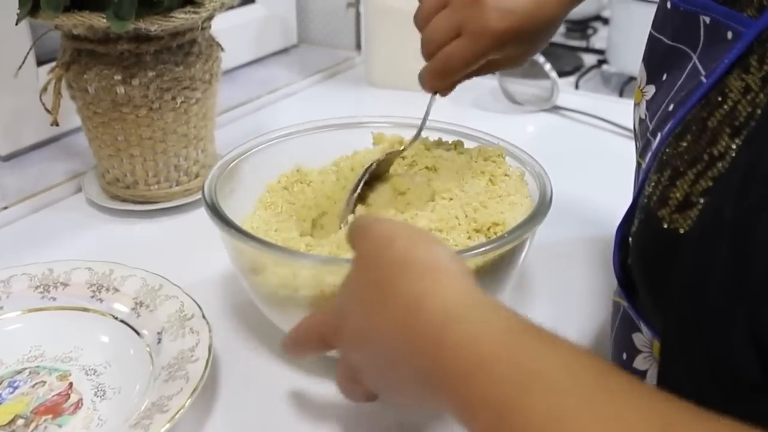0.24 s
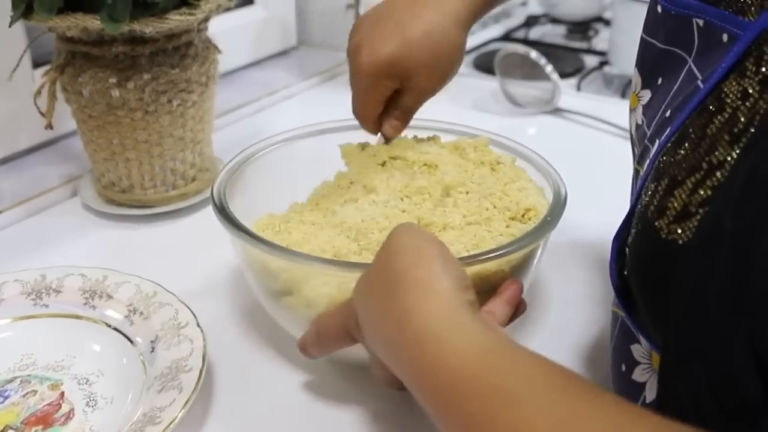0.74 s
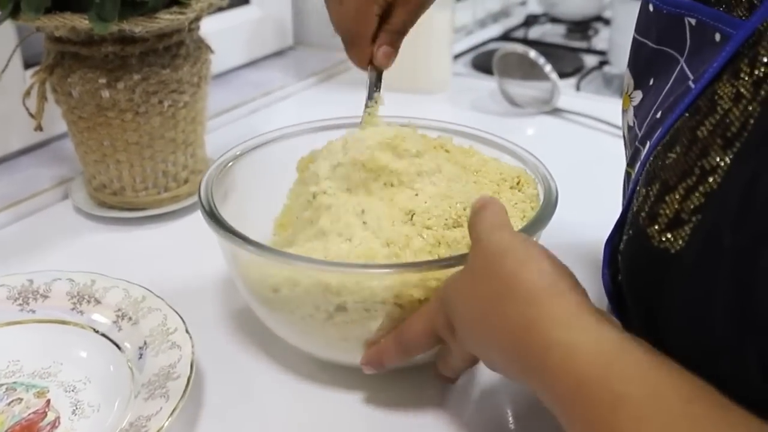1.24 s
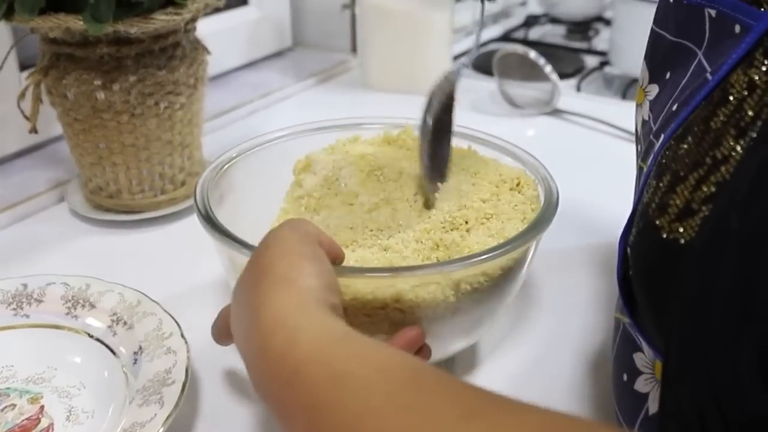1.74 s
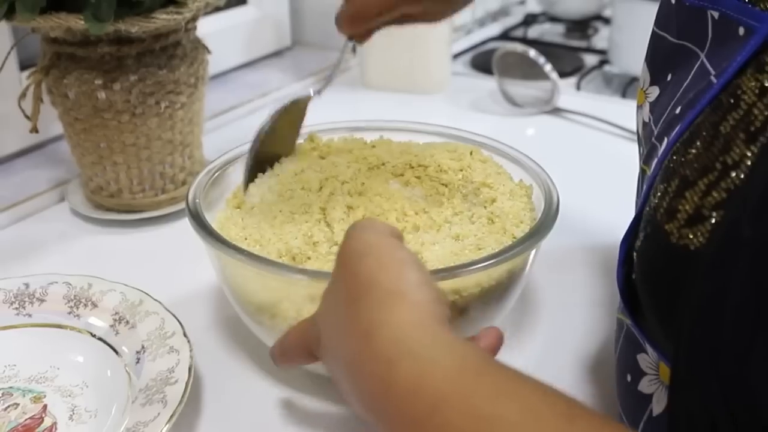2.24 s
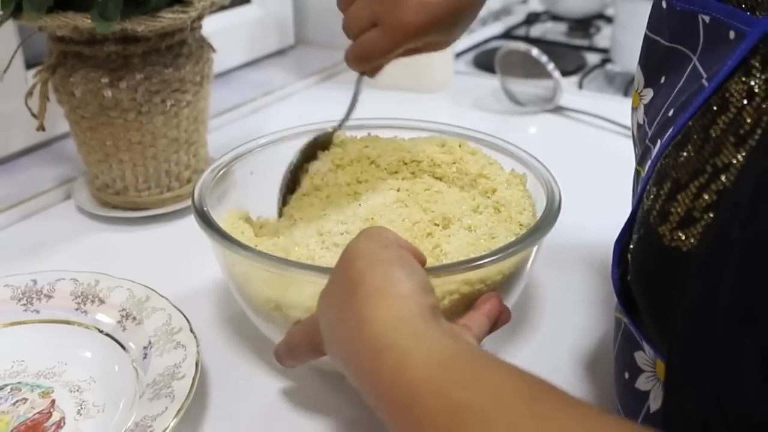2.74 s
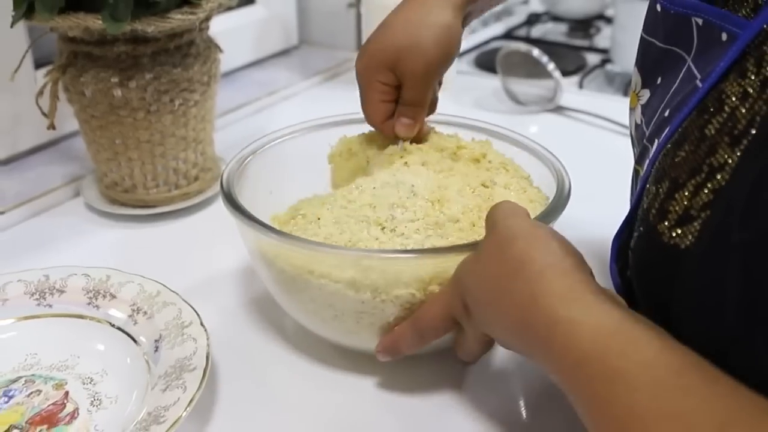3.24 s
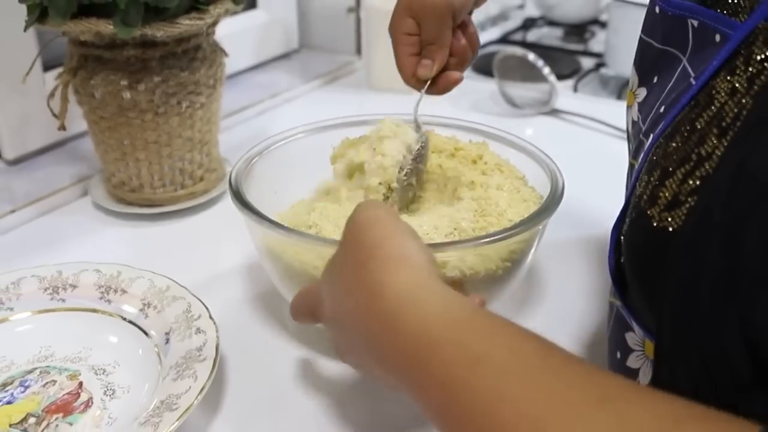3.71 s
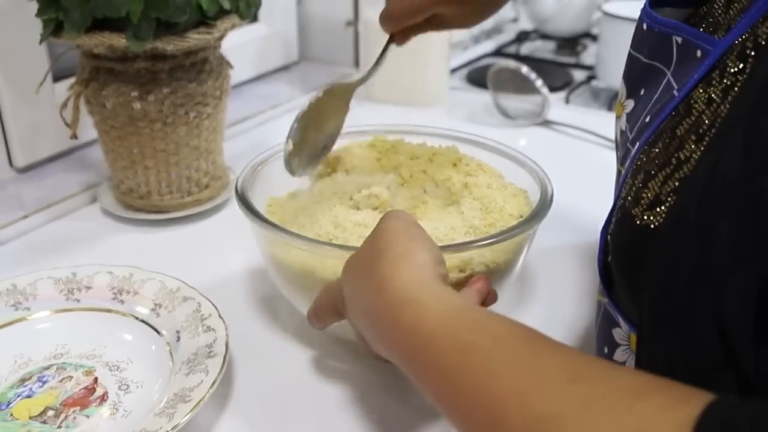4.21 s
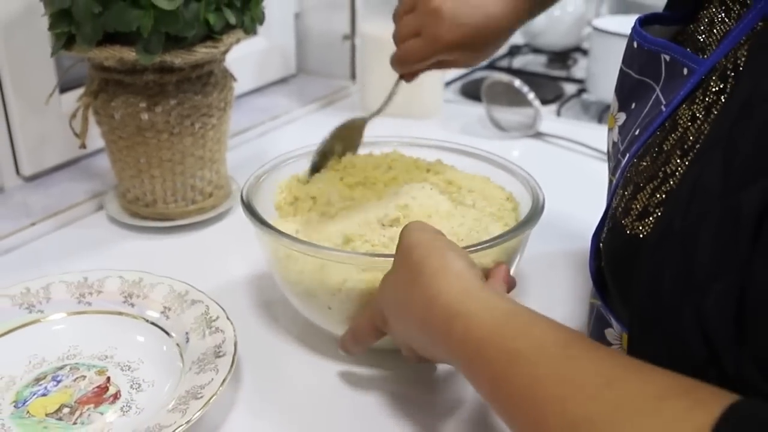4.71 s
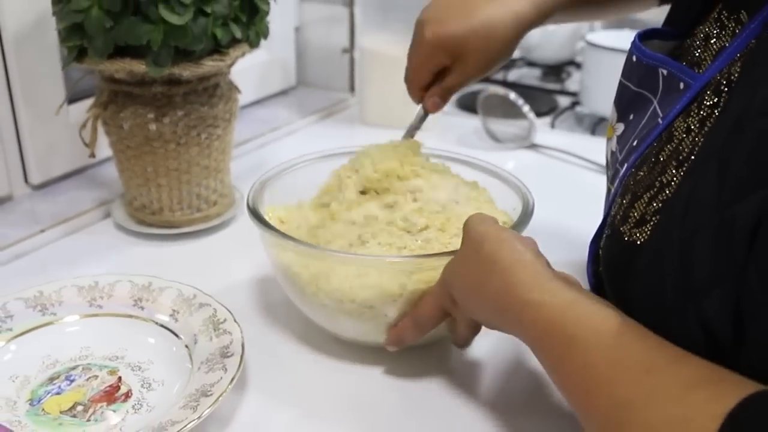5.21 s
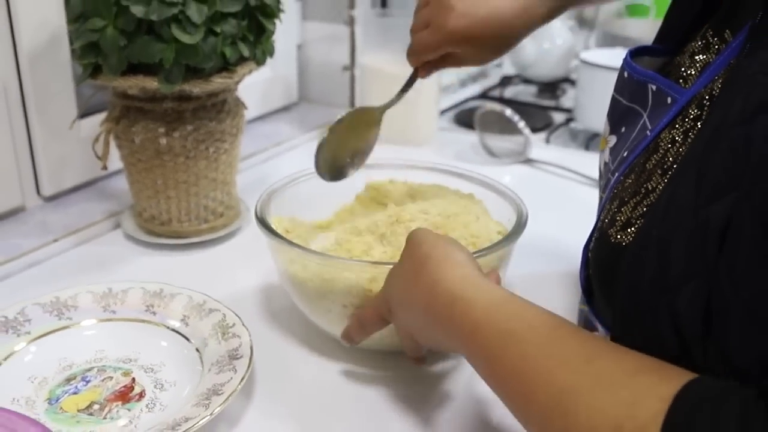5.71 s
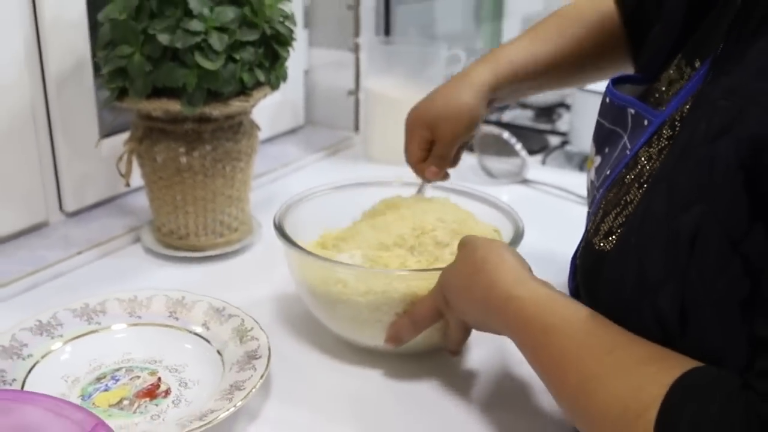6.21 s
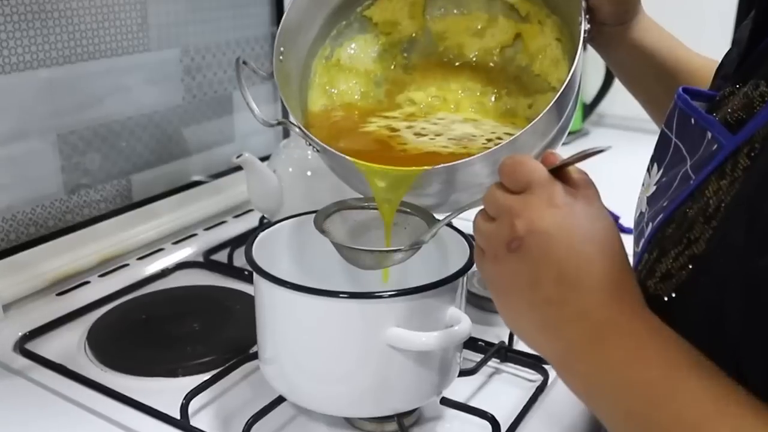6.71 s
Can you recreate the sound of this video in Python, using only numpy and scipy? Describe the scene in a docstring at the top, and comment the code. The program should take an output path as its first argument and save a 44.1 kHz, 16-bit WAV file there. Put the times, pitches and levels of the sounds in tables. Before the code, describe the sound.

Soft rustling of ground nuts and sugar, loud spoon clinks on glass and a bowl bumping the counter, followed by booming pan knocks.

```python
"""A soft rustle comes first: a metal spoon stirs ground nuts and sugar in a glass bowl in a small kitchen.
Its edge scrapes the glass and strikes a few loud clinks, which a limiter ducks. Turned by hand, the bowl
slips on the counter in bumps and squeaks. A fluttering whir, likely a gas flame, runs behind.
After a short silent break a metal pan booms at the stove: two knocks and a faint third."""
import sys
import numpy as np
from scipy import signal
from scipy.fft import rfft, irfft, next_fast_len
from scipy.io import wavfile
from scipy.ndimage import uniform_filter1d, minimum_filter1d

SR = 44100
rng = np.random.default_rng(int(sys.argv[2]) if len(sys.argv) > 2 else 0)


def output_pcm(signal):
    """Save a mono or channel-first signal as 16-bit PCM at the path in sys.argv[1].

    Samples are clipped to [-1, 1] before scaling.
    """
    pcm = np.clip(np.atleast_2d(signal).T, -1, 1) * 32767
    wavfile.write(sys.argv[1], SR, np.round(pcm).astype(np.int16))


N = 306486
TIME = np.arange(N) / SR

# spoon hits on glass: (time [s], strength [dB], contact cut-off [Hz], ring [dB], crack t60 [s],
# pan left [dB], mode favoured by the strike point [Hz], its boost [dB])
CLINKS = [(0.602, -2.5, 13200, 5, 0.069, -1.5, 3300, 1), (0.6068, -0.5, 10950, -10.5, 0.037, 3, 3270, 3),
          (2.7652, -19.5, 6900, -0.5, 0.16, 2, 1120, 8.5), (2.815, -18.5, 12100, -8, 0.11, 0.5, 2070, 12),
          (4.78, -5, 7030, 1.5, 0.081, 1, 4380, 8), (5.9196, -1, 6460, -0.5, 0.054, 0, 6030, 3.5)]
# modes of the filled bowl: (frequency [Hz], level [dB], t60 [s])
BOWL_MODES = [(1112, -13, 0.06), (2063, -12, 0.06), (2160, -8.5, 0.024), (3268, -2.5, 0.04),
              (3347, -10, 0.12), (4684, -3.5, 0.064), (4774, -7, 0.14), (6300, -15.5, .085),
              (7420, -37.5, 0.031), (7430, -13, 0.051), (7790, -18, 0.079), (9300, -32.5, .05),
              (10450, -57, 0.03986), (13800, -43, .05)]
# tone of the contact crack: (frequency [Hz], gain [dB])
CRACK_COLOUR = [(90, -31), (170, -18), (450, 3.5), (750, 0.5), (1200, -5), (2500, -3), (4200, 6),
                (5800, 2.5), (7800, 0.5), (10000, -6.5), (13000, -12), (15500, -17)]
# spoon strokes through the crumbs: (time [s], length [s], relative level [dB])
STROKES = [(0.0, 0.42, -50), (1.15, 0.26, -56.5), (1.98, 0.61, -57), (3.145, 1.1, -57.5), (4.38, 0.65, -53),
           (5.07, 1.1, -54), (6.2, 0.15, -52.5)]
# tone of shifting crumbs: (frequency [Hz], gain [dB])
CRUMB_COLOUR = [(100, -24.5), (800, 0), (2000, 7), (3600, 7), (6500, -9), (9000, -17.5), (15000, -32.5)]
# the spoon's edge scraping the glass: (time [s], length [s], level [dB])
SCRAPES = [(0.26, 0.047, -53.5), (0.388, 0.035, -48), (0.841, 0.017, -38.5), (2.92, 0.019, -52),
           (3.028, 0.043, -40.5), (3.052, 0.021, -37), (5.158, 0.02, -60)]
# tone of metal dragging on glass: (frequency [Hz], gain [dB])
SCRAPE_COLOUR = [(100, -11), (1000, -5.5), (3600, 9.5), (6500, 5.5), (9000, -0.5), (15000, -21)]

# the bowl juddering on the counter: (time [s], length [s], level [dB], tilt [dB/octave])
BUMPS = [(0.343, 0.023, -44, 12), (0.4139, 0.0066, -29.5, 5.5), (0.96, 0.014, -45, -10),
         (2.39, 0.047, -33, -5), (2.768, 0.037, -41, -6), (2.948, 0.0055, -43, 12),
         (3.049, 0.026, -39.5, 1), (3.112, 0.01, -29, 0.5)]
# what a judder shakes, the lows for longer: (frequency [Hz], width [Hz], level [dB], linger [s])
COUNTER_RESONANCES = [(135, 110, -17.5, 0.08), (350, 300, -1.5, 0.018), (750, 540, -3.5, 0.003),
                      (1286, 440, -2.5, 0.001)]
# the bowl sliding round with a low rumble: (time [s], length [s], level [dB])
SLIDES = [(0.874, 0.25, -50.5), (3.124, 0.085, -48), (3.729, 0.19, -53)]
# glass squeaking on the counter: (time [s], length [s], level [dB], start pitch [Hz], end pitch [Hz])
SQUEAKS = [(0.365, 0.03, -28, 808, 738), (0.381, 0.027, -36, 1219, 1246)]

# pan knocks: (time [s], level [dB], free ring [s], ring gain at rest [dB], scuff [dB], favoured mode [Hz])
KNOCKS = [(6.5224, -15, .095, -29, -15.5, 3450), (6.7192, -16, .085, 1.5, -22, 3640),
          (6.882, -30.5, .1, -3, -14.5, 3580)]
# modes of the pan: (frequency [Hz], level [dB], t60 [s])
PAN_MODES = [(184, -23, 0.2), (239.6, -23, 0.25), (342.6, -18.5, 0.47), (408, -13, 0.24),
             (472.4, 1.5, 0.35), (554, -4, 0.12), (603, -13.5, 0.29), (948, -22.5, 0.21),
             (3500, -34.5, 0.55), (3585, -37.5, 0.44)]
# tone of the pan's scuff: (frequency [Hz], gain [dB])
SCUFF_COLOUR = [(100, -26), (400, -10), (600, 6.5), (800, 0), (2000, -7.5), (5000, -12), (15000, -33.5)]

# slow swings of the flame's whir: (time [s], relative level [dB])
FLAME_SWINGS = [(0, -36.5), (.6, -44.5), (.95, -40), (1.11, -45), (1.25, -39), (1.7, -46), (2.25, -39.5),
                (2.6, -43.5), (3.1, -40.5), (4.15, -37.5), (4.33, -43.5), (4.73, -37), (5.2, -38.5),
                (5.7, -36), (5.8, -40.5), (6.3, -36.5), (6.45, -40.5), (6.95, -40.5)]
# resonances of the whir: (frequency [Hz], width [Hz], level [dB])
WHIR_RESONANCES = [(1231, 58, -2), (1364, 171, 0), (1458, 59, -19.5)]
# higher resonances, lit by the flame's sputters: (frequency [Hz], width [Hz], level [dB])
FLUTTER_RESONANCES = [(1990, 230, 1), (2155, 520, -4), (3440, 590, -7.5)]
# the flame's loudest puffs: (time [s], relative flare level [dB], relative sputter level [dB])
LOUD_PUFFS = [(1.201, -29, -49), (1.238, -33, -48), (1.27, -30, -63), (1.413, -30, -52),
              (1.543, -30.5, -40.5), (1.782, -32, -54), (2.026, -41, -46), (3.441, -30, -44.5),
              (3.573, -31, -43), (3.828, -30, -44), (3.856, -39, -45), (3.986, -30, -48),
              (4.141, -29.5, -46), (4.237, -30, -56), (5.105, -25.5, -56), (5.167, -27.5, -39.5),
              (5.207, -25, -52), (5.362, -42, -45), (5.521, -31, -44)]

# decay of the kitchen: (frequency [Hz], t60 [s])
ROOM_T60 = [(150, .4), (1000, .48), (4500, .48), (8000, .45), (14000, .32)]
# tone of its reverb: (frequency [Hz], gain [dB])
ROOM_COLOUR = [(80, -7.5), (200, 6.5), (500, 3), (1100, 5), (2200, 5.5), (4700, -2.5), (8000, -3.5),
               (14000, -3.5)]
# tone of the steady kitchen air: (frequency [Hz], gain [dB])
AIR_COLOUR = [(25, -11), (50, -1.5), (80, 0), (120, 1.5), (270, 3.5), (380, -0.5), (650, -1.5),
              (1000, -5.5), (2000, -6.5), (3000, -13), (5000, -16.5), (8000, -22.5), (12000, -30.5),
              (15500, -36)]
# stereo image of diffuse sound: (frequency [Hz], left-right likeness [0 wide to 1 mono])
LIKENESS = [(60, 0.61), (290, 0.83), (640, 0.37), (1400, 0.97), (3000, 0), (15000, 0.16)]


def clinks(snap_db=-5, snap_t60=0.017, crack_db=-15.0, chatter_db=4.5, left_lag_s=4.5e-5):
    """Each touch of the spoon cracks and rings the glass, which the filling damps quickly."""
    out, t = np.zeros((2, N)), TIME[:SR // 2]
    for s, db, contact_hz, ring_db, crack_t60, pan_db, favoured_hz, boost_db in CLINKS:
        modes = favour(BOWL_MODES, favoured_hz, boost_db, octaves=0.1)
        ring = np.array([struck(modes, np.maximum(t - left_lag_s, 0)), struck(modes, t)])
        # a hard snap, then the spoon skids in a spray of tiny contacts
        snap = from_db(snap_db - 60 * t / snap_t60)
        skid = from_db(crack_db - 60 * t / crack_t60)
        chatter = pair(*grains(20000, chatter_db, len(t)), alike=0.73)
        crack = coloured(chatter, CRACK_COLOUR) * (snap + skid)
        lowpass = signal.butter(1, contact_hz, fs=SR, output="sos")
        clink = signal.sosfilt(lowpass, from_db(ring_db) * ring + crack)
        add(out, s, panned(from_db(db) * clink, pan_db))
    return out


def crumbs(rustle_trim_db=-6):
    """Sugar and nut grains crunch under the spoon, brighter where its edge drags on the glass."""
    rustle = from_db(rustle_trim_db) * stirring()
    drag = sum(from_db(db) * swell(TIME - s, length) for s, length, db in SCRAPES)
    crunch = grains(per_s=9000, spread_db=6.0, size=next_fast_len(N))
    return rustle * coloured(crunch, CRUMB_COLOUR)[:, :N] + drag * coloured(crunch, SCRAPE_COLOUR)[:, :N]


def stirring(attack_s=0.022, release_s=0.067, sag_db_per_s=2):
    """Envelope of the rustle: each stroke digs in, eases as the crumbs give way, and lifts out."""
    gain = np.zeros(N)
    for s, length, db in STROKES:
        t = TIME - s
        contact = np.clip(np.minimum(t / attack_s, (length - t) / release_s), 0, 1)
        gain += contact * from_db(db - sag_db_per_s * np.clip(t, 0, length))
    return gain


def bowl_on_counter(tilt_pivot_hz=500, squeak_rough=0.25, squeak_drift=0.013):
    """Irregular slips make dull bumps and rumbles; regular ones lock into a short squeak."""
    out, t = np.zeros((2, N)), TIME[:SR // 2]
    for s, length, db, tilt in BUMPS:
        for hz, width_hz, part_db, linger_s in COUNTER_RESONANCES:
            tilt_db = tilt * np.log2(hz / tilt_pivot_hz)
            add(out, s, from_db(db + part_db + tilt_db) * judder(length + linger_s, hz, width_hz))
    for s, length, db in SLIDES:
        add(out, s, from_db(db) * judder(length, hz=53.4, width_hz=19))
    for s, length, db, start_hz, end_hz in SQUEAKS:
        waver = rms_one(resonate(rng.standard_normal(len(t)), hz=150, width_hz=270))
        pitch_hz = np.interp(t, [0, length], [start_hz, end_hz]) * (1 + squeak_drift * waver)
        tone = np.sqrt(2) * np.sin(2 * np.pi * np.cumsum(pitch_hz) / SR)
        add(out, s, from_db(db) * swell(t, length) * (1 + squeak_rough * waver) * tone)
    return panned(out, pan_db=2.5)


def judder(length, hz, width_hz):
    """A quick push and slow release of irregular slips, heard through one resonance."""
    t = TIME[:SR // 2]
    push = swell(np.sqrt(t / length), 0.96)
    slips = pair(*grains(per_s=6000, spread_db=7.6, size=len(t)), alike=0.97)
    return rms_one(resonate(slips * push, hz, width_hz)) * np.sqrt(np.mean(push ** 2))


def pan_knocks(scuff_t60=0.29, rise_s=0.0011, settle_s=0.031, rattle=0.16):
    """A blow sets the pan's low wall mode booming; it rattles, then is choked or rings on as it rests."""
    out, t = np.zeros((2, N)), TIME[:SR // 2]
    for s, db, free_s, rest_db, scuff_db, favoured_hz in KNOCKS:
        wobble = 1 + rattle * rms_one(resonate(rng.standard_normal(len(t)), hz=67, width_hz=98))
        ring = struck(favour(PAN_MODES, favoured_hz, boost_db=12, octaves=.04), t) * wobble
        settling = from_db(rest_db * np.clip((t - free_s) / settle_s, 0, 1))
        scuff = stereo_noise(SCUFF_COLOUR, len(t)) * from_db(scuff_db - 60 * t / scuff_t60)
        attack = 1 - np.exp(-t / rise_s)
        add(out, s, from_db(db) * (ring * settling + scuff) * attack)
    return out


def flame(whir_trim_db=-2.5, flutter_trim_db=-22, flare_trim_db=-0.5, sputter_trim_db=-1.0,
          flare_hz=1375, flare_s=.011, sputter_s=0.018):
    """An uneven whir that flares in short puffs; sputters light up its higher resonances."""
    swing_db = np.interp(TIME, *np.transpose(FLAME_SWINGS))
    whir = from_db(swing_db + whir_trim_db) * burn(WHIR_RESONANCES, alike=0.42, per_s=550, spread_db=2.5)
    flutter_gain = from_db(swing_db + flutter_trim_db)
    t = TIME[:SR // 12]
    for s, flare_db, sputter_db in list(LOUD_PUFFS) + lesser_puffs(swing_db):
        phase = 2 * np.pi * (flare_hz + rng.normal(0, 50)) * t + rng.normal(0, 0.56, (2, 1))
        add(whir, s - flare_s / 2, from_db(flare_db + flare_trim_db) * swell(t, flare_s) * np.sin(phase))
        add(flutter_gain, s - sputter_s / 2, from_db(sputter_db + sputter_trim_db) * swell(t, sputter_s))
    flutter = flutter_gain * burn(FLUTTER_RESONANCES, alike=0.083, per_s=1600, spread_db=4.0)
    return panned(whir + flutter, pan_db=3.0)


def burn(resonances, alike, per_s, spread_db):
    """Tiny puffs ring a few resonances, with the slow swings evened out; rms 1."""
    puffs = pair(*grains(per_s, spread_db, N), alike)
    ringing = sum(from_db(db) * resonate(puffs, hz, width) for hz, width, db in resonances)
    power = uniform_filter1d(np.mean(ringing ** 2, axis=0), size=3000)
    return ringing / np.sqrt(np.abs(power) + 1e-12)


def lesser_puffs(swing_db, per_s=13, lift_db=5.5, spread_db=1.5, bright_db=-15.5, bright_spread_db=4):
    """Random puffs, in rows like LOUD_PUFFS; they ride the whir, and the bigger ones sputter more."""
    rows = []
    for when, size, brightness in rng.random((int(per_s * N / SR), 3)):
        flare_db = swing_db[int(when * N)] + lift_db + spread_db * (2 * size - 1)
        sputter_db = flare_db + bright_db + bright_spread_db * (2 * brightness - 1)
        rows.append((when * N / SR, flare_db, sputter_db))
    return rows


def kitchen_reverb(x, build_s=0.0027):
    """Dense reflections off tiles and cupboards, dying soonest in the top treble; unit power gain."""
    t = TIME[:SR]
    bins, hz = rfft(stereo_noise(ROOM_COLOUR, SR)), np.fft.rfftfreq(SR, 1 / SR)
    centres, t60s = np.transpose(ROOM_T60)
    tail = 0
    for share, t60 in zip(np.eye(len(centres)), t60s):
        band = irfft(bins * at_hz(list(zip(centres, share)), hz), SR)
        tail = tail + band * from_db(-60 * t / t60)
    tail = rms_one(tail * (1 - np.exp(-t / build_s))) / np.sqrt(SR)
    return signal.fftconvolve(x, tail, axes=1)[:, :N]


def kitchen_air(level_db=-47.0):
    """Room tone: a steady bed of dark, diffuse noise."""
    return panned(from_db(level_db) * stereo_noise(AIR_COLOUR, N), pan_db=1.0)


def struck(modes, t):
    """Decaying sines of a struck body, alternating in sign."""
    return sum((-1) ** k * from_db(db - 60 * t / t60) * np.sin(2 * np.pi * hz * t)
               for k, (hz, db, t60) in enumerate(modes))


def favour(modes, favoured_hz, boost_db, octaves):
    """Modes that swing widely at the strike point take more of the blow."""
    return [(hz, db + boost_db * np.exp(-(np.log2(hz / favoured_hz) / octaves) ** 2), t60)
            for hz, db, t60 in modes]


def grains(per_s, spread_db, size):
    """Random clicks of uneven size in two channels."""
    born = rng.random((2, size)) < per_s / SR
    polarity = rng.choice([-1, 1], (2, size))
    return born * polarity * from_db(spread_db * np.minimum(rng.exponential(1, (2, size)), 4))


def resonate(x, hz, width_hz):
    """A steep resonance: the same two-pole filter twice."""
    r = np.exp(-np.pi * width_hz / SR)
    g = (1 - r * r) / 2
    return signal.sosfilt([[g, 0, -g, 1, -2 * r * np.cos(2 * np.pi * hz / SR), r * r]] * 2, x + 1e-18)


def coloured(x, colour):
    """EQ a steady noise; rms 1."""
    size = x.shape[-1]
    gain = from_db(at_hz(colour, np.fft.rfftfreq(size, 1 / SR)))
    return rms_one(irfft(rfft(x) * gain, size))


def stereo_noise(colour, size):
    """Diffuse noise, widest in the treble; rms 1."""
    padded = next_fast_len(size)
    hz = np.fft.rfftfreq(padded, 1 / SR)
    bins = pair(*rfft(rng.standard_normal((2, padded))), at_hz(LIKENESS, hz))
    return rms_one(irfft(bins * from_db(at_hz(colour, hz)), padded)[:, :size])


def swell(t, length):
    """A half-sine fade in and out."""
    return np.sin(np.pi * np.clip(t / length, 0, 1))


def pair(mid, side, alike):
    """Two channels of a given likeness from two unrelated signals."""
    return np.sqrt(1 + alike) * mid + np.sqrt(1 - alike) * side * np.array([[1], [-1]])


def panned(x, pan_db):
    """Lean a sound to the left by pan_db."""
    return x * from_db([[pan_db / 2], [-pan_db / 2]])


def add(out, s, sound):
    """Mix a sound in at time s."""
    start = max(round(s * SR), 0)
    out[..., start:start + sound.shape[-1]] += sound[..., :N - start]


def at_hz(points, hz):
    """Read a table on a log-frequency axis."""
    f, value = np.transpose(points)
    return np.interp(np.log(hz + 1), np.log(f), value)


def from_db(db):
    """Decibels to gain."""
    return 10 ** (np.asarray(db) / 20)


def rms_one(x):
    """Scale to unit power."""
    return x / np.sqrt(np.mean(x ** 2) + 1e-20)


def limiter(x, threshold_db=0.2, attack_s=.004, hold_s=.035, release_db_per_s=170):
    """Peaks over the threshold pull the gain down within a few ms; it holds, then climbs back."""
    over_db = np.maximum(20 * np.log10(np.abs(x).max(axis=0) + 1e-9) - threshold_db, 0)
    half = int(hold_s * SR / 2)
    held_db = -minimum_filter1d(-over_db, 2 * half + 1, origin=half)
    cut_db = np.maximum.accumulate(held_db + release_db_per_s * TIME) - release_db_per_s * TIME
    pole = np.exp(-1 / (attack_s * SR))
    return x * from_db(-signal.lfilter([1 - pole], [1, -pole], cut_db))


def scene(clink_send_db=-7.5, bowl_send_db=-11, pan_send_db=-10, crumb_send_db=-9):
    """Spoon, bowl and pan up front, each with a reverb send, over the dry flame and room tone."""
    glass, bowl, pan, rustle = clinks(), bowl_on_counter(), pan_knocks(), crumbs()
    send = (from_db(clink_send_db) * glass + from_db(bowl_send_db) * bowl
            + from_db(pan_send_db) * pan + from_db(crumb_send_db) * rustle)
    return glass + bowl + pan + rustle + kitchen_air() + kitchen_reverb(send) + flame()


def record(dry, break_start_s=6.365, break_end_s=6.405, top_cut_hz=15800):
    """Master chain: limiter, clipping at full scale, a silent break before the pan, a steep top cut."""
    sounding = (TIME < break_start_s) | (TIME > break_end_s)
    clipped = np.clip(limiter(dry), -1, 1)
    top_cut = signal.ellip(10, .1, 80, top_cut_hz, fs=SR, output="sos")
    return signal.sosfilt(top_cut, clipped * sounding)


dry = scene()
out = record(dry)
output_pcm(out)
```